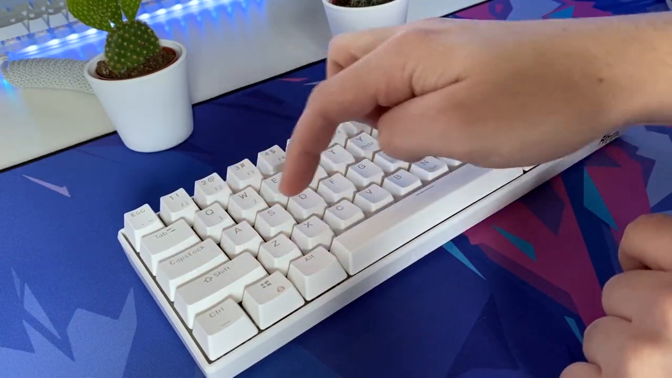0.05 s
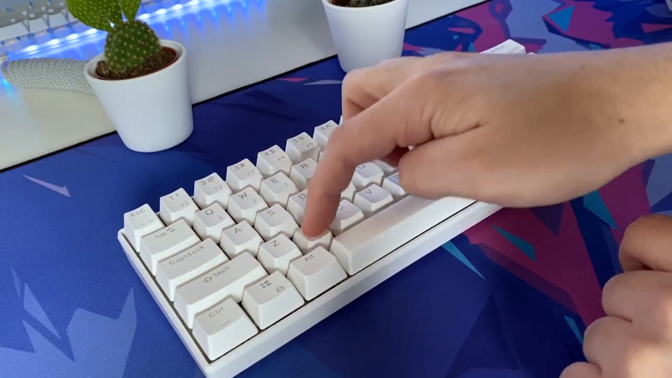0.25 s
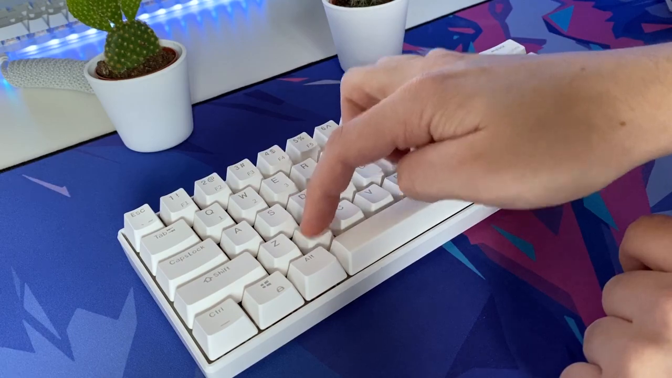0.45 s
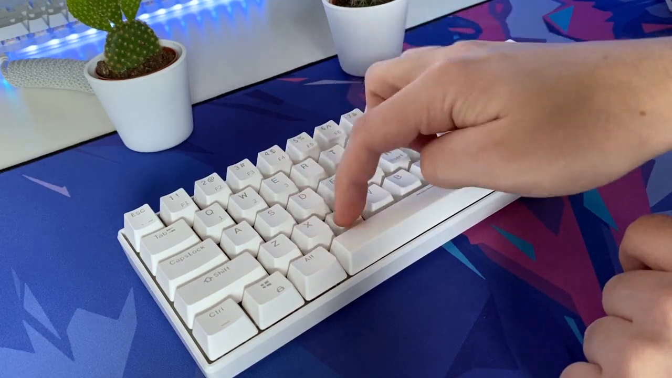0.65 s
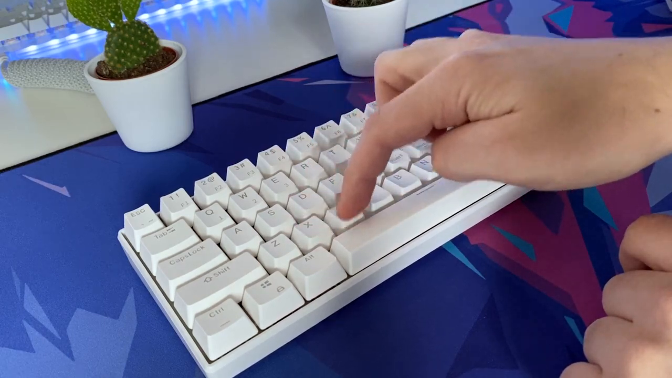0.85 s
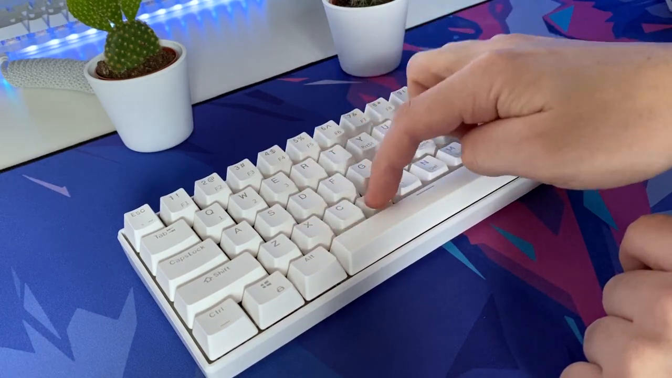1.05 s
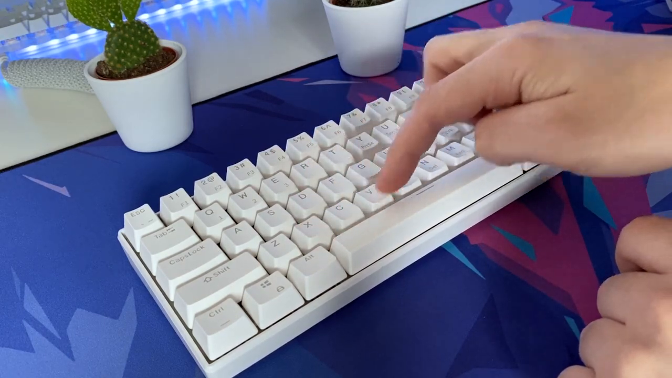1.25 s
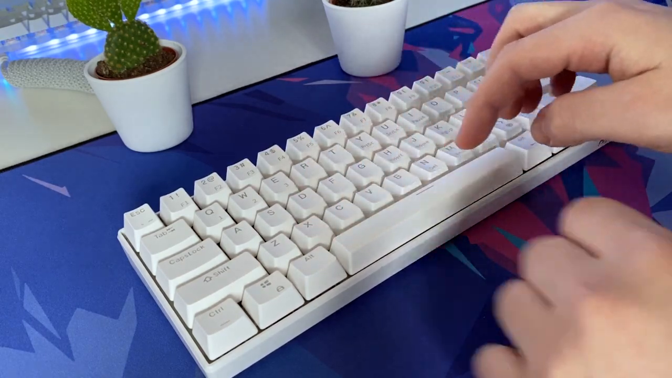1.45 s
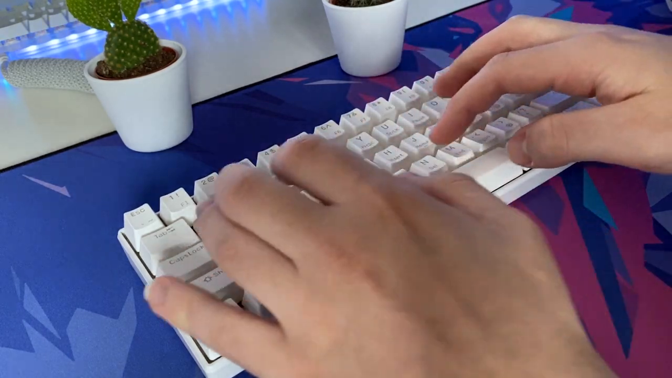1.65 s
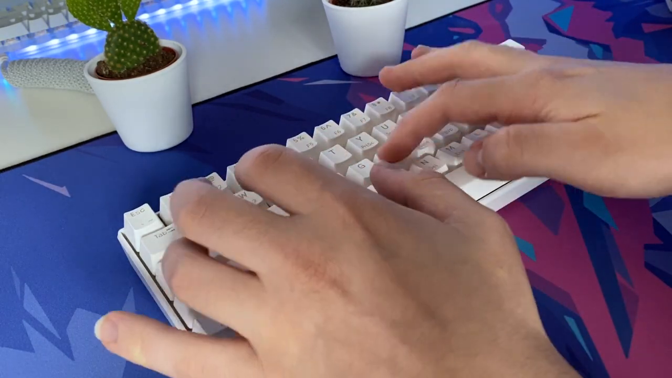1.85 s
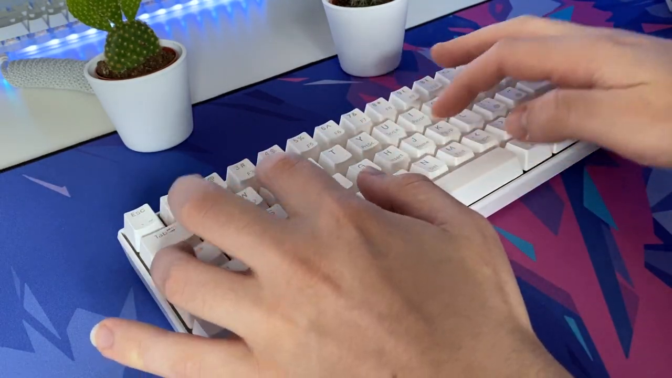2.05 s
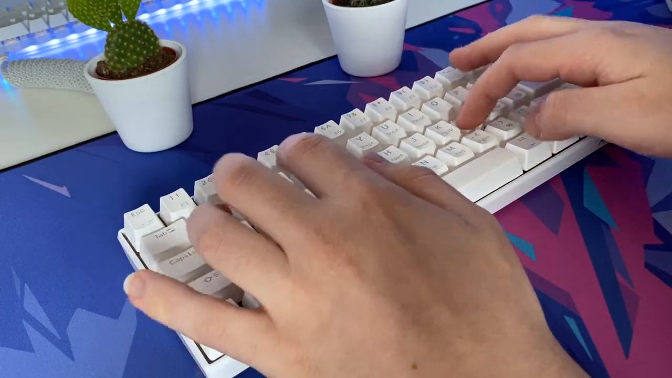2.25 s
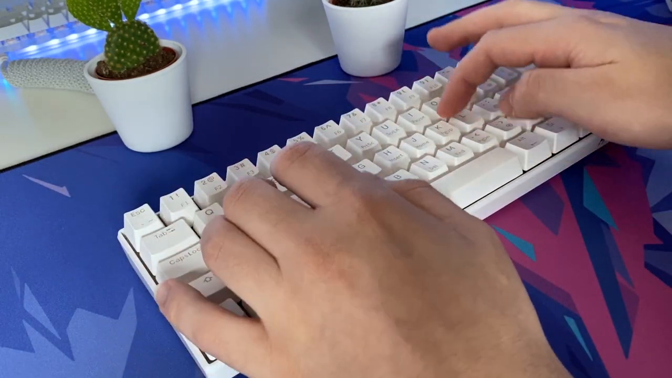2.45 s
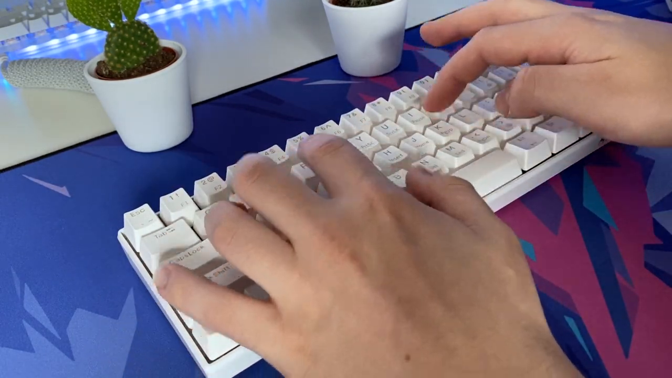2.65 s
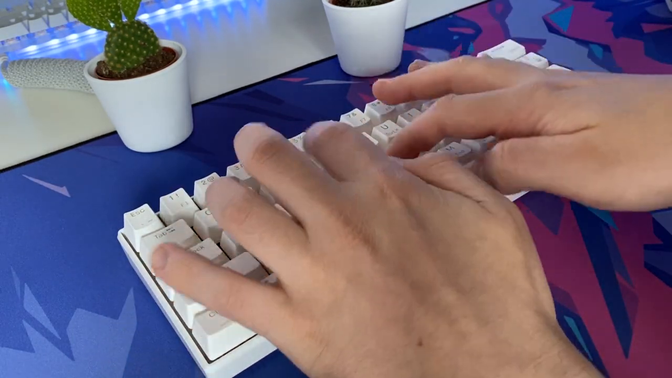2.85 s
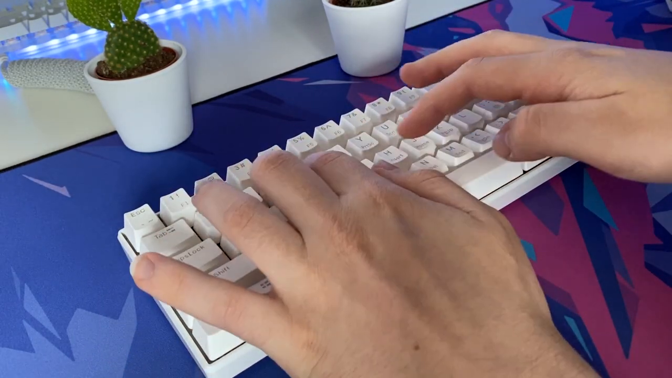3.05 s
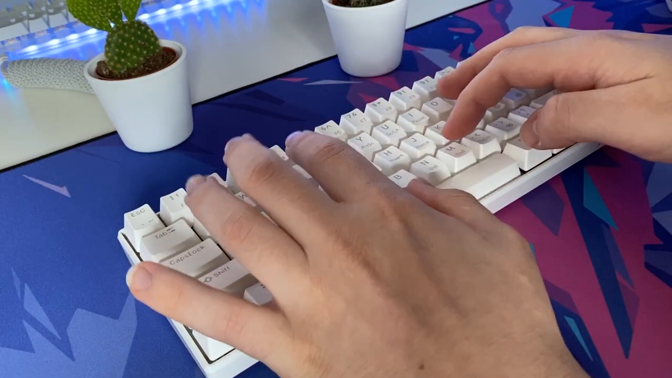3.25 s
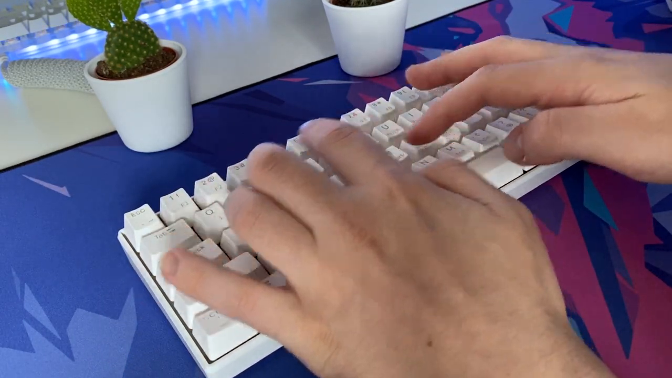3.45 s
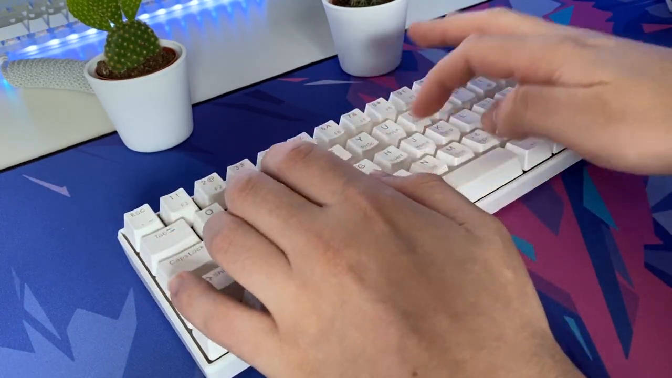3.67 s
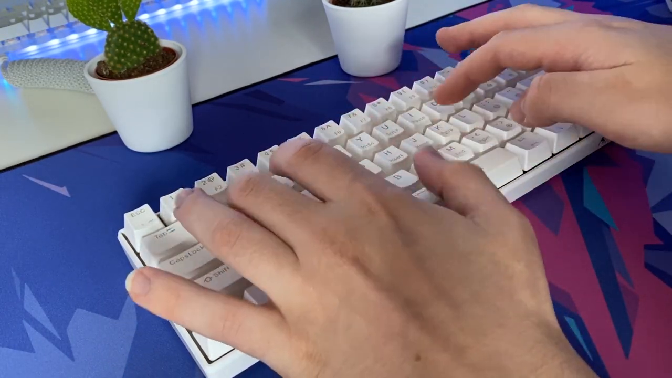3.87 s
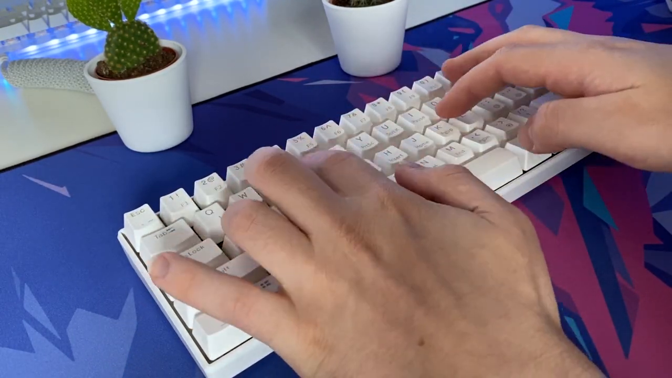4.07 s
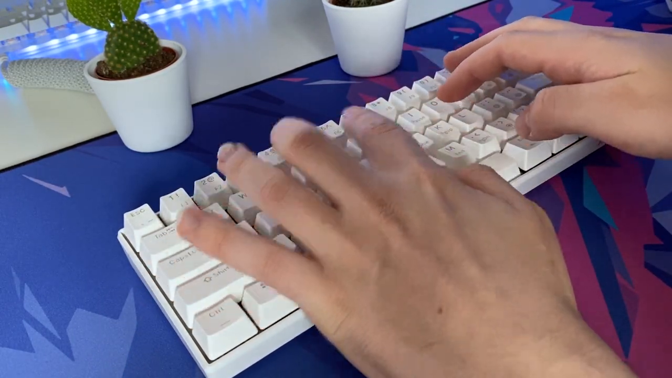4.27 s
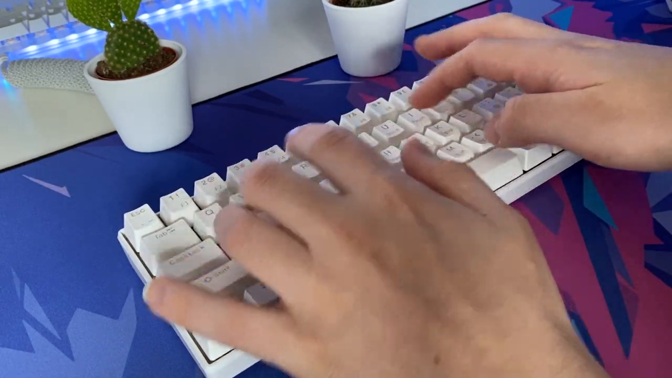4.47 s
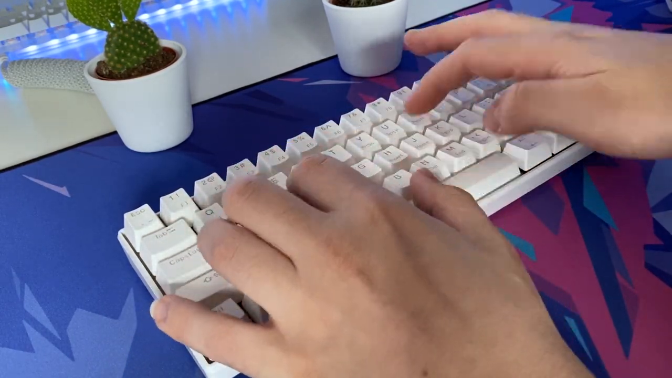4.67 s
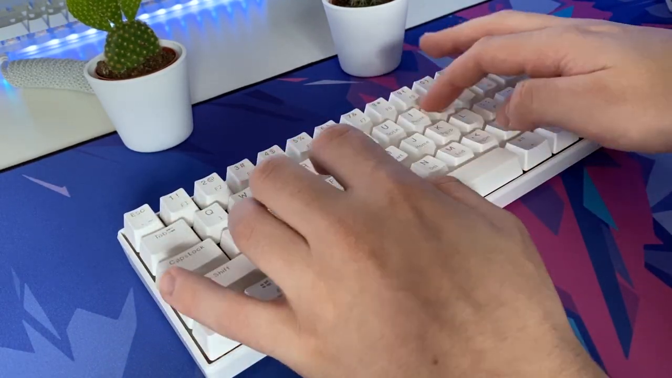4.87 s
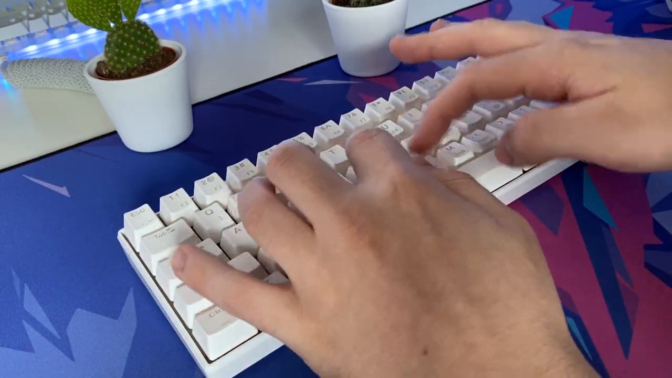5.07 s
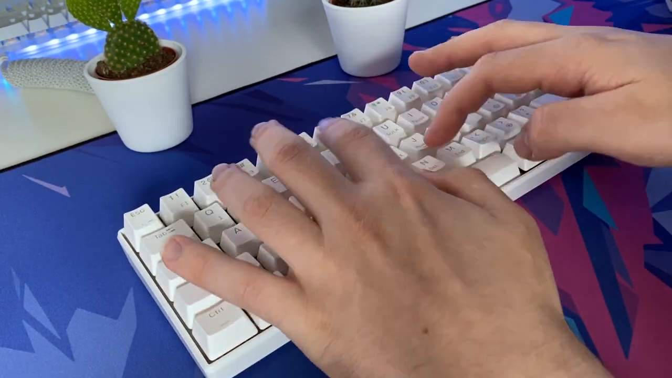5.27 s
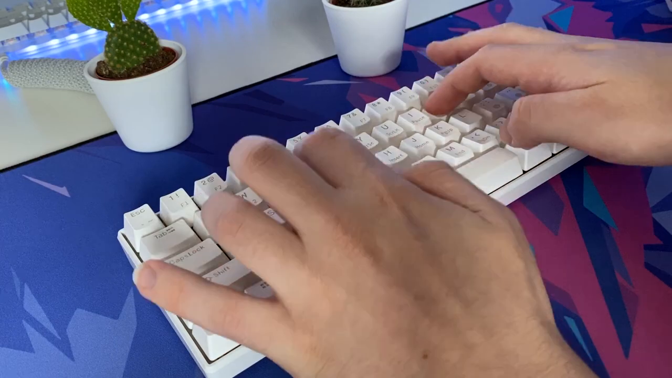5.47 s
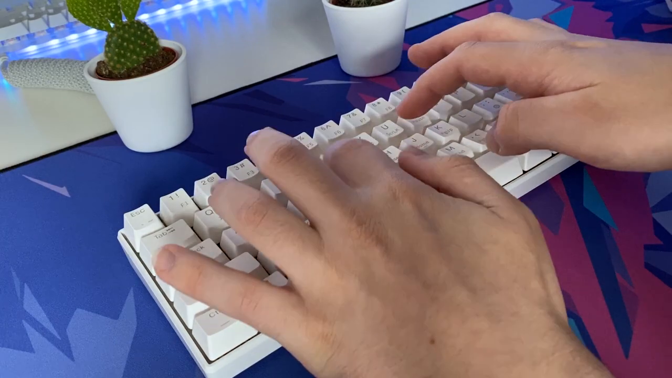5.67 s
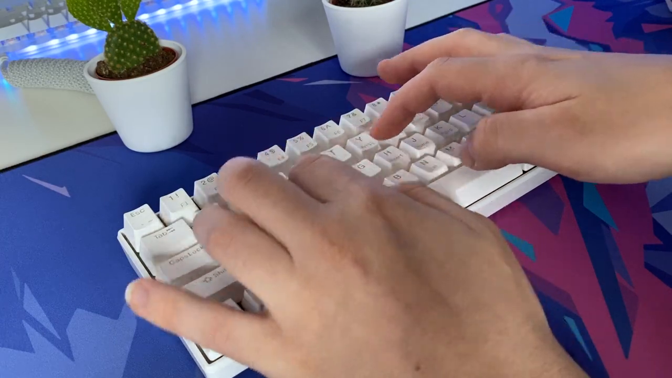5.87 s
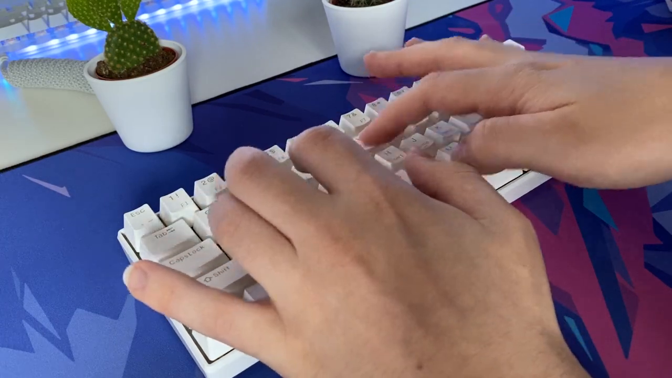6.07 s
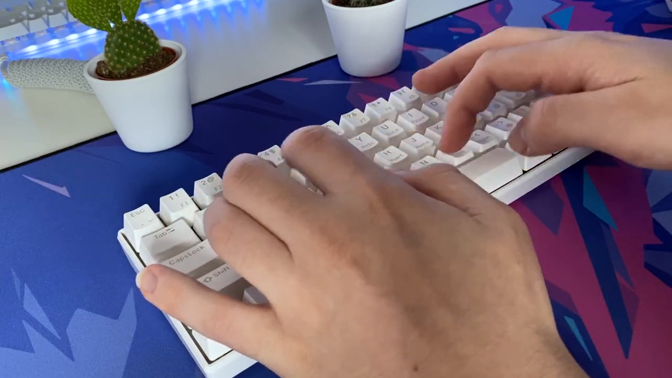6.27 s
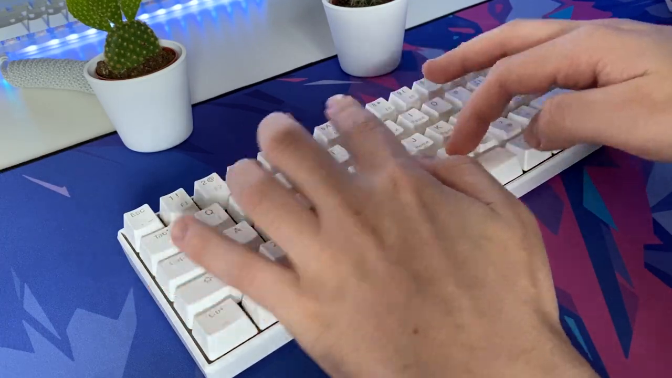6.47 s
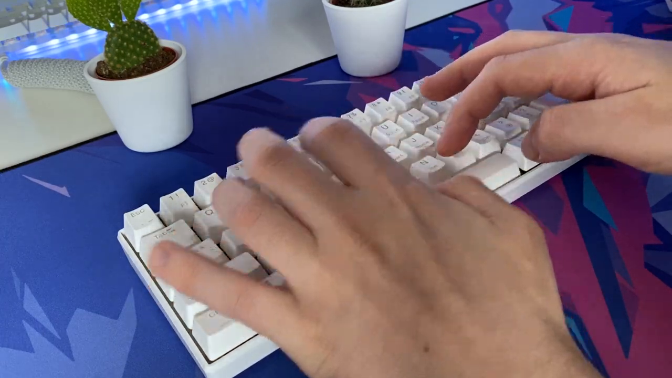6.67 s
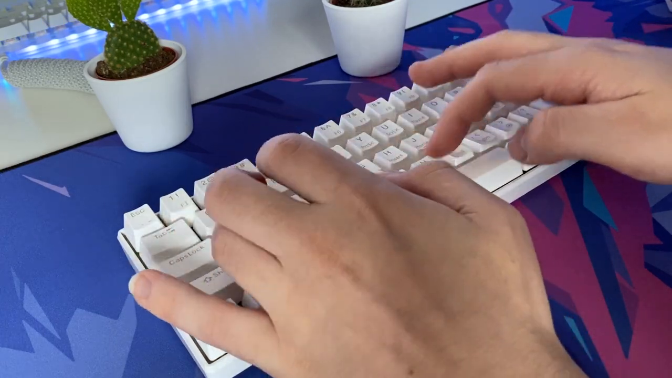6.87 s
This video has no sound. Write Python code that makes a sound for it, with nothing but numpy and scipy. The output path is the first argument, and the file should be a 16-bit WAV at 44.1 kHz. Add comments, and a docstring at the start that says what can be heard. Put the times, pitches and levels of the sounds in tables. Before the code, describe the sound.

Close stereo pickup of a small plastic mechanical keyboard on a desk mat in a quiet, slightly live room with faint hum. Six separate taps come first, each a press with a soft low thump and a clacky return. A short palm brush follows, then fast, uneven typing with tiny gaps. Six louder, hard space bar clacks stand out, and the keys run on to the end.

```python
"""Fast typing on a small plastic mechanical keyboard on a desk mat, heard close by in a quiet room.
From the start there is a faint room hum with three narrow tones, both made from noise; keys soon join in.
Each stem contact (finger touch, bottoming out, return) is a noisy force exciting case, cap and switch modes,
and contacts also send a low bending wave through the desk. At 1.43 s a palm brushes the mat, as shaped hiss;
from 2.7 s the long space bar adds six hard clacks among the keys, which continue to the end."""
import sys
import numpy as np
from scipy import signal
from scipy.fft import rfft, irfft, next_fast_len
from scipy.io import wavfile

SR = 44100
rng = np.random.default_rng(int(sys.argv[2]) if len(sys.argv) > 2 else 0)


def put_to_file(sound):
    """Save the sound as 16-bit audio at rate SR, in the file named by the first command-line argument."""
    columns = np.atleast_2d(sound).T  # one column per channel
    safe = np.clip(columns, -1, 1)
    whole_steps = np.round(safe * 32767)
    wavfile.write(sys.argv[1], SR, whole_steps.astype(np.int16))


N = 305172

# Room tone, spectral shape: f/Hz, relative level per Hz/dB
HUM_SPECTRUM = [(30, -3), (60, -4), (100, -14), (150, -11), (212, 3.5), (260, -10.5), (600, -21.5),
                (1200, -27), (10500, -47.5), (13000, -59)]
# Faint narrow tones in the room: f/Hz, level/dB
ROOM_TONES = [(597, -71.5), (780, -82.5), (940, -81)]
# Phase between the two microphone ports: f/Hz, left leads by/rad
PORT_PHASE = [(300, 0), (2670, 1.3), (6800, 0.1), (16100, -16.5)]
# Level difference between the ports: f/Hz, left over right/dB
PORT_BALANCE = [(100, 1.5), (1170, -.6), (2740, 4), (6410, 4), (9810, 0.3)]
# Palm sliding on the mat, gain of the hiss: t/s, level/dB
PALM_SLIDE = [(1.43, -70), (1.456, -51.5), (1.54, -59), (1.62, -95)]
# Space bar bottoming out: t/s, level/dB, travel after the thumb's touch/ms, touch level/dB
SPACE_BAR_PRESSES = [(2.709, -25, 8, -66), (3.273, -18, 8, -52), (3.944, -21, 21, -47.5),
                     (4.693, -21.5, 12, -46), (5.317, -22.5, 9, -52), (6.188, -23.5, 10, -60)]
# Keys bottoming out: t/s, cap level/dB, desk thump level/dB, travel after the finger's touch/ms
# (0 if the finger already rests there)
KEY_PRESSES = [(0.298, -41.5, -38, 0), (0.427, -47.5, -31.5, 0), (0.676, -34, -27, 9),
               (0.826, -39, -27.5, 13.5), (1.049, -32.5, -28, 7), (1.182, -37.5, -30, 0),
               (1.735, -72, -50, 0), (1.922, -43, -39, 26), (2.131, -36.5, -42.5, 14),
               (2.257, -35, -36, 11), (2.412, -42.5, -41.5, 21), (2.573, -38, -31.5, 0),
               (2.858, -43.5, -49, -2), (2.907, -45.5, -43.5, 0), (2.965, -25, -32, 3.5),
               (3.131, -36.5, -37, 2.5), (3.584, -44.5, -38.5, 19.5), (3.779, -36.5, -29, 7),
               (3.839, -36.5, -41, 0), (4.025, -41, -34, 25.5), (4.105, -36, -39, 1.5),
               (4.146, -34, -37.5, 6.5), (4.346, -36, -37.5, 9), (4.42, -45, -45.5, 0),
               (4.448, -42.5, -40, 0), (4.603, -34, -30, 11.5), (4.759, -36, -36, 0),
               (4.844, -35, -31, 5.5), (4.999, -40, -34, 18), (5.153, -35.5, -29, 5),
               (5.491, -42.5, -40.5, 0), (5.676, -41, -42.5, 13), (5.87, -30, -33.5, 8),
               (5.969, -32, -34.5, 8.5), (6.021, -44, -36, 1), (6.418, -34.5, -30.5, 9),
               (6.595, -37.5, -40, 4), (6.71, -34.5, -36, 14.5), (6.819, -41.5, -31.5, 0),
               (6.866, -40.5, -36.5, 11.5)]
# Keys, and now and then the space bar, springing back to the top: t/s, reference level/dB, case pitch there
# f/Hz, switch level/dB
RETURNS = [(0.377, -34, 1470, -48.5), (0.506, -32, 1530, -39.5), (0.736, -32, 1360, -37),
           (0.903, -32, 1370, -44), (1.124, -36, 1060, -40.5), (1.272, -36.5, 1420, -50),
           (1.765, -37.5, 965, -57.5), (1.862, -35.5, 935, -51.5), (1.975, -33, 980, -50),
           (2.008, -41, 1370, -57), (2.103, -37, 980, -55), (2.213, -34.5, 1350, -43),
           (2.33, -33, 1310, -45), (2.478, -29, 1360, -47), (2.665, -31.5, 1420, -50.5),
           (2.791, -28.5, 1330, -49), (2.809, -31.5, 1540, -53), (3.042, -27.5, 1470, -44),
           (3.203, -32.5, 1360, -44), (3.372, -26.5, 1310, -49), (3.632, -36.5, 1270, -54),
           (3.654, -32.5, 1350, -45), (3.871, -34, 1330, -50), (4.015, -29.5, 1220, -62),
           (4.176, -27, 1390, -52), (4.216, -43, 1290, -49.5), (4.261, -29, 1330, -35),
           (4.374, -25, 1230, -47.5), (4.506, -34.5, 1400, -47), (4.776, -27, 1300, -49),
           (4.925, -36.5, 1460, -48), (5.087, -34, 1390, -50), (5.188, -35, 1380, -45.5),
           (5.255, -33.5, 1390, -44.5), (5.39, -25.5, 1470, -48), (5.564, -33.5, 1350, -39.5),
           (5.738, -34, 1370, -51), (5.994, -36.5, 1340, -47.5), (6.058, -38.5, 1430, -47.5),
           (6.107, -37.5, 1090, -48.5), (6.27, -27, 1300, -49.5), (6.502, -46, 1690, -57),
           (6.516, -42, 1290, -55), (6.657, -29, 1490, -52), (6.768, -24.5, 1430, -46),
           (6.902, -36, 1150, -44)]
# Modes of the long bar: f/Hz, relative level/dB
BAR_MODES = [(380, -14), (1350, 4.5), (1990, 9), (2270, 16), (2450, 7.5), (2900, -24)]
# Modes of the case: f/Hz at mid-board, relative level/dB
CASE_MODES = [(930, -27), (1180, 4), (1390, 23), (1620, 5)]
# Modes of the key cap: f/Hz, relative level/dB
CAP_MODES = [(2050, -9.5), (2450, 4), (2920, 11), (3350, -1), (3800, -43)]
# Modes of the switch: f/Hz, relative level/dB
SWITCH_MODES = [(5600, -2), (7800, 3.5), (9500, 2), (12300, -33), (14300, -13.5)]

TIME = np.arange(9000) / SR             # time axis of one short sound, s
HZ = np.arange(N // 2 + 1) * SR / N     # frequency axis of the whole scene
HUM_DB, HUM_ALIKE_HZ = -54, 440
ROOM_DB, ROOM_T60_S, ROOM_TILT_HZ = -5.5, 0.18, 8000
SCATTER_HZ, SCATTER_RAD = 117, 1.2      # bandwidth and rms of the wandering phase
PALM_DESK_DB, PALM_BOOM_DB = -34, -34.5
# relative to the level of the bar's blow
BAR_DESK_DB, BAR_BOOM_DB, BAR_SWITCH_DB = -10.5, -12, -22
# relative to the reference level of a return
RETURN_CASE_DB, RETURN_CAP_DB, RETURN_DESK_DB = -7, -11, -15
# levels at the usual press; they follow a share of the cap's swing about it
USUAL_PRESS_DB, FOLLOW_SHARE = -40, 0.39
PRESS_CASE_DB, PRESS_SWITCH_DB = -41, -47.5
TOUCH_DB = np.array([-54.5, -54, -51.5])   # finger touch: cap, case, switch
CASE_HZ = 1390                          # pitch of the case at mid-board
LEAD = 440                              # samples of stem travel before the stop
BASS_CUT_HZ, CUTOFF_HZ = 47, 16900


def amp(db):
    """Level to amplitude: 20 dB is a factor of ten."""
    return 10 ** (np.asarray(db) / 20)


def at_hz(points):
    """Logarithmic pitch scale: interpolate a table over log frequency."""
    f, value = np.transpose(points)
    return np.interp(np.log(HZ + 1), np.log(f), value)


def add(out, t_s, sound, lead=0):
    """Superposition: add a sound to the mix at its time, starting lead samples early."""
    start = round(t_s * SR) - lead
    out[start:start + len(sound)] += sound[:N - start]


def hum():
    """Diffuse-field coherence: room tone is alike at both ports in the bass and unrelated above."""
    mid, side = rfft(rng.standard_normal((2, N))) * amp(at_hz(HUM_SPECTRUM))
    coherence = .95 / (1 + (HZ / HUM_ALIKE_HZ) ** 2)
    common, opposed = np.sqrt(1 + coherence) * mid, np.sqrt(1 - coherence) * side
    out = irfft(common + opposed * [[1], [-1]], N)
    return amp(HUM_DB) * out / np.std(out)


def whine():
    """Narrow-band noise: two quadrature carriers with slow random amplitudes make a wavering tone."""
    slow = signal.butter(2, 6.0, fs=SR, output="sos")
    waver = signal.sosfilt(slow, rng.standard_normal((len(ROOM_TONES), 2, N)))
    waver = waver / np.std(waver)
    phase = 2 * np.pi * np.arange(N) / SR
    out = np.zeros(N)
    for (hz, db), (a, b) in zip(ROOM_TONES, waver):
        out += amp(db) * (a * np.cos(hz * phase) + b * np.sin(hz * phase))
    return out


def scattered(x):
    """Phase modulation: walls hear the board from all sides, so a wandering phase blurs its single modes."""
    lowpass = signal.butter(2, SCATTER_HZ, fs=SR, output="sos")
    wander = signal.sosfilt(lowpass, rng.standard_normal(N))
    analytic = signal.hilbert(x, next_fast_len(N))[:N]
    return np.real(analytic * np.exp(1j * SCATTER_RAD * wander / np.std(wander)))


def room(x):
    """Reverberation: dense decaying reflections, different at each port and duller in the treble."""
    dull = signal.butter(1, ROOM_TILT_HZ, fs=SR, output="sos")
    tail = signal.sosfilt(dull, rng.standard_normal((2, len(TIME))))
    tail = tail * amp(-60 * TIME / ROOM_T60_S)
    tail = tail / np.sqrt(np.sum(tail ** 2, axis=1, keepdims=True))   # unit energy
    return amp(ROOM_DB) * signal.fftconvolve(x[None], tail, axes=1)[:, :N]


def ports(x):
    """Interaural-like cues: the ports differ in level and phase by an amount that depends on pitch."""
    phase = np.interp(HZ, *np.transpose(PORT_PHASE))
    half = amp(at_hz(PORT_BALANCE) / 2) * np.exp(.5j * phase)   # half the difference goes to each port
    return irfft(rfft(x) * np.array([half, 1 / half]), N)


def brush():
    """Friction noise: skin sliding on cloth gives a smooth bright hiss."""
    t, level_db = np.transpose(PALM_SLIDE)
    band = signal.butter(1, [2500, 12000], "band", fs=SR, output="sos")
    hiss = signal.sosfilt(band, rng.standard_normal(N))
    gain_db = np.interp(np.arange(N) / SR, t, level_db, left=-np.inf, right=-np.inf)
    return amp(gain_db) * hiss


def desk_thump():
    """Dispersion: bending waves travel faster at high pitch, so the thump glides down to the lowest mode."""
    t, crest_s = TIME, .019
    turns = np.cumsum(67 + 130 * np.exp(-t / 0.011)) / SR   # glides from 197 towards 67 Hz
    pulse = (t / crest_s * np.exp(1 - t / crest_s)) ** 5.5
    tail = .45 * (1 - np.exp(-(t / .04) ** 2)) * np.exp(-t / .06)
    return -(pulse + tail) * np.cos(2 * np.pi * (turns - turns[round(crest_s * SR)]))


def case_boom():
    """Damped resonance: the lowest mode of the case swells quickly and dies away."""
    t = TIME
    return (1 - np.exp(-(t / 0.0044) ** 2)) * np.exp(-t / 0.022) * np.sin(2 * np.pi * 212 * t)


def desk():
    """Structure-borne sound: presses, bar blows, palm and returns all drive the desk."""
    thump, boom = desk_thump(), case_boom()
    out = np.zeros(N)
    palm_lands_s = PALM_SLIDE[1][0]
    add(out, palm_lands_s, amp(PALM_BOOM_DB) * boom + amp(PALM_DESK_DB) * thump)
    for t_s, db, *_ in RETURNS:   # a return nudges the desk a little
        add(out, t_s, amp(db + RETURN_DESK_DB) * thump)
    for t_s, db, *_ in SPACE_BAR_PRESSES:
        add(out, t_s, amp(db + BAR_BOOM_DB) * boom + amp(db + BAR_DESK_DB) * thump)
    for t_s, _, thump_db, _ in KEY_PRESSES:
        add(out, t_s, amp(thump_db) * thump)
    return out


def strike(modes, t60, detune, chatter_s):
    """Modal excitation: a stem scrapes in, stops with brief chatter and rattles on; rms 1 just after the stop."""
    t = TIME[:2600]
    # in moulded plastic each mode is a loose cluster of four
    hz, level_db = np.repeat(modes, 4, axis=0).T[:, :, None]
    level_luck, pitch_luck = rng.standard_normal((2, len(hz), 1))
    decay = amp(level_db + 2 * level_luck - 60 * t / t60)
    rings = decay * np.sin(2 * np.pi * hz * (1 + detune * pitch_luck) * t)
    after = t - LEAD / SR   # time since the stop
    scrape = amp(-27) * np.exp(np.minimum(after, 0) / .007)
    rattle = amp(-13.5) * np.exp(-after / 0.0045) * rng.standard_normal(len(t)) ** 2   # uneven grains
    stop = after / chatter_s * np.exp(1 - after / chatter_s)   # builds up, then lets go
    force = np.where(after < 0, scrape, stop + rattle) * rng.standard_normal(len(t))
    sound = signal.fftconvolve(rings.sum(axis=0), force)[:len(t)]
    return sound / np.sqrt(np.mean(sound[LEAD:LEAD + 260] ** 2))


def space_bar():
    """Impact on coupled bodies: the long bar clacks hard together with the switch beneath it."""
    out = np.zeros(N)
    for t_s, db, *_ in SPACE_BAR_PRESSES:
        add(out, t_s, amp(db) * strike(BAR_MODES, .013, 0.021, 0.00029), LEAD)
        add(out, t_s, amp(db + BAR_SWITCH_DB) * strike(SWITCH_MODES, 0.0092, 0.0073, 0.0012), LEAD)
    return out


def contacts():
    """Impact sequence of touch, bottom and return: rows of t/s, cap, case and switch level/dB, case f/Hz."""
    rows = []
    for t_s, db, hz, switch_db in RETURNS:
        rows.append((t_s, db + RETURN_CAP_DB, db + RETURN_CASE_DB, switch_db, hz))
    for t_s, _, travel_ms, touch_db in SPACE_BAR_PRESSES:   # only the thumb's touch
        rows.append((t_s - travel_ms / 1e3, touch_db, touch_db, touch_db, CASE_HZ))
    for t_s, cap_db, _, travel_ms in KEY_PRESSES:
        swing_db = FOLLOW_SHARE * (cap_db - USUAL_PRESS_DB)
        rows.append((t_s, cap_db, PRESS_CASE_DB + swing_db, PRESS_SWITCH_DB + swing_db, CASE_HZ))
        if travel_ms > 2:   # a shorter travel has no separate touch
            rows.append((t_s - travel_ms / 1e3, *(TOUCH_DB + swing_db), CASE_HZ))
    return rows


def keys():
    """Modal superposition: case, cap and switch answer every contact in their own shares."""
    out = np.zeros(N)
    for t_s, cap_db, case_db, switch_db, case_hz in contacts():
        case_modes = np.multiply(CASE_MODES, [case_hz / CASE_HZ, 1])   # shift pitch, keep levels
        add(out, t_s, amp(cap_db) * strike(CAP_MODES, .011, 0.054, 0.00045), LEAD)
        add(out, t_s, amp(case_db) * strike(case_modes, 0.017, 0.032, 0.003), LEAD)
        add(out, t_s, amp(switch_db) * strike(SWITCH_MODES, .003, 0.082, 0.00085), LEAD)
    return out


def scene():
    """Superposition of fields: direct sound and room through the ports, over the room tone."""
    no_bass = signal.butter(2, 800, "high", fs=SR, output="sos")   # small parts radiate no bass
    board = signal.sosfilt(no_bass, keys()) + space_bar() + brush()
    reflections = room(scattered(board))
    return ports(board + desk() + reflections) + hum() + whine()


def record(dry):
    """Band limiting: the deep bass rolls off and the top is cut steeply."""
    highpass = signal.butter(4, BASS_CUT_HZ, "high", fs=SR, output="sos")
    lowpass = signal.cheby2(12, 70, CUTOFF_HZ, fs=SR, output="sos")
    return signal.sosfilt(lowpass, signal.sosfilt(highpass, dry))


dry = scene()
out = record(dry)
put_to_file(out)
```